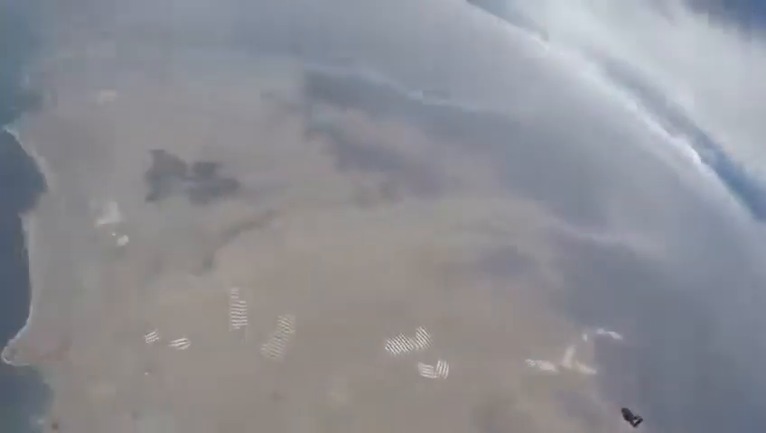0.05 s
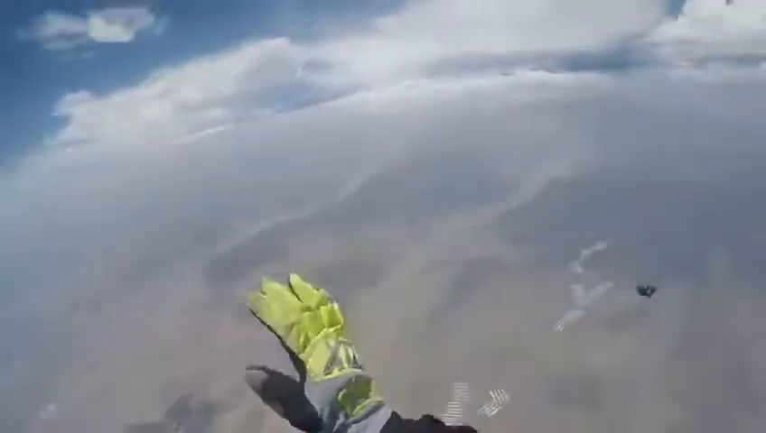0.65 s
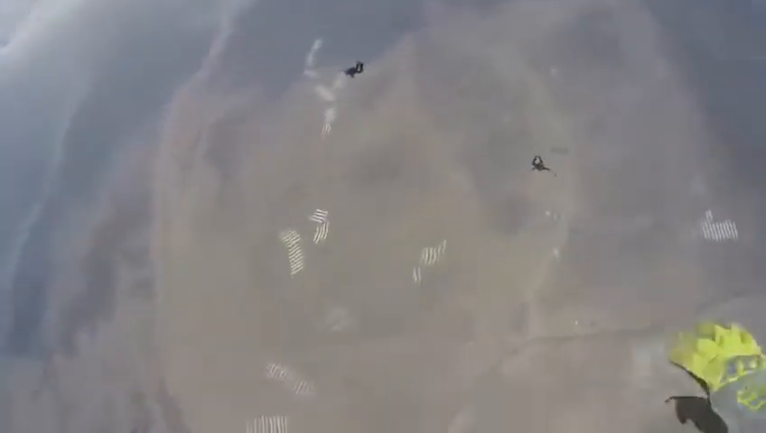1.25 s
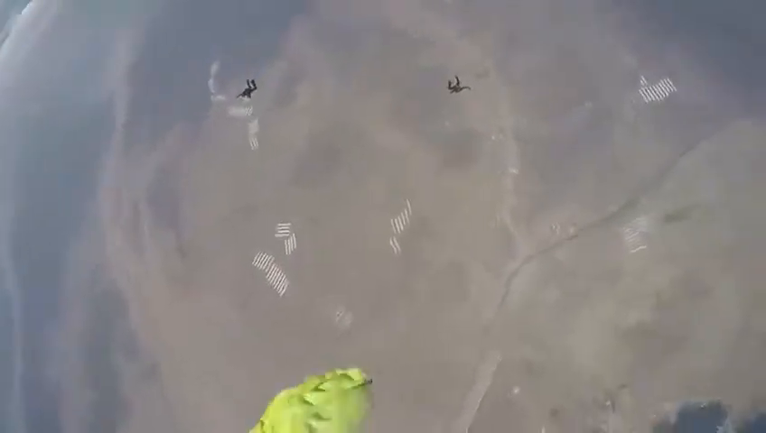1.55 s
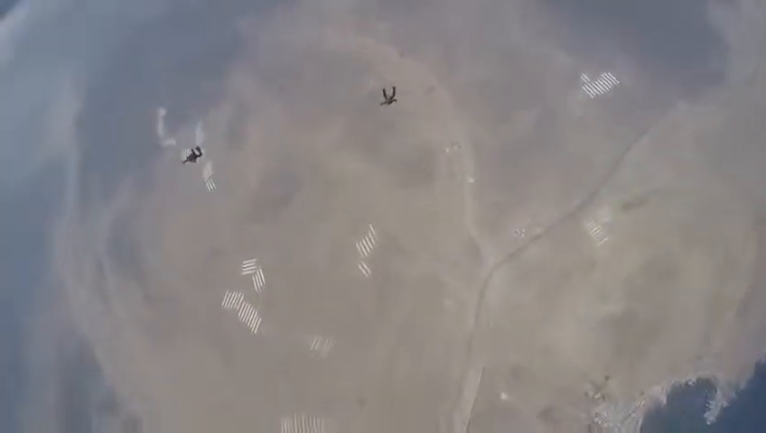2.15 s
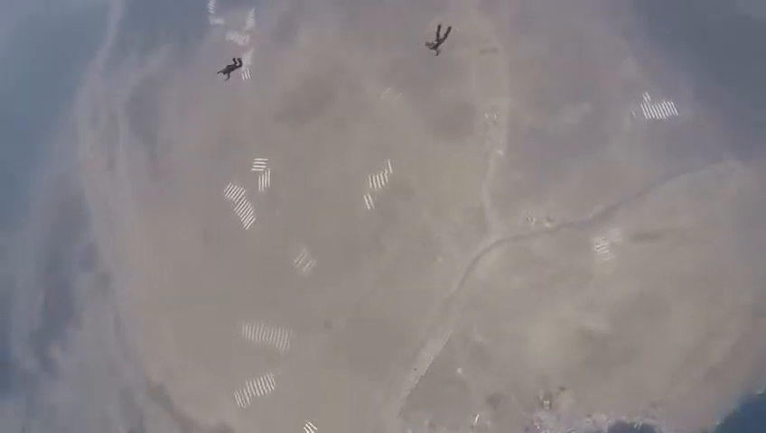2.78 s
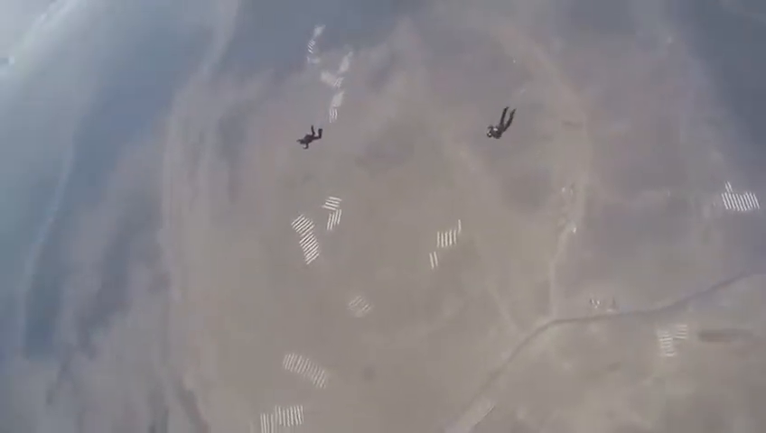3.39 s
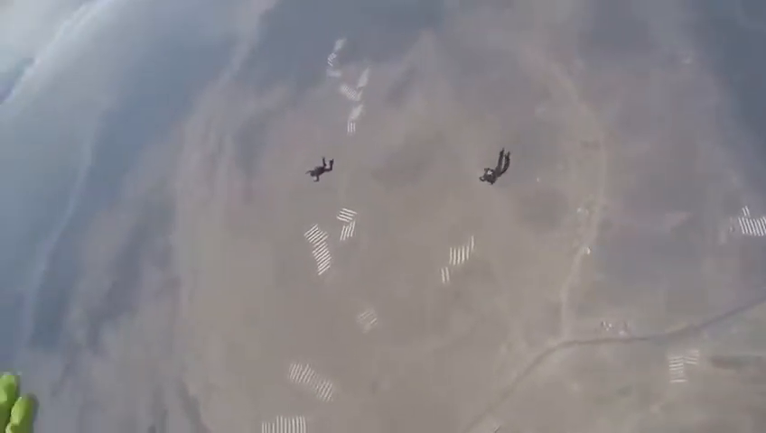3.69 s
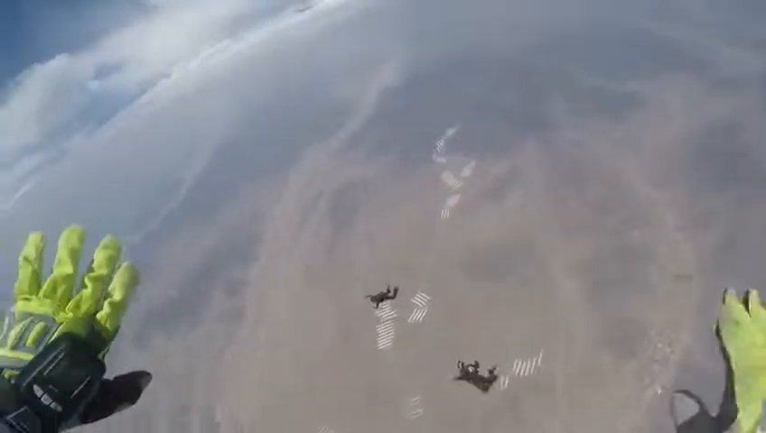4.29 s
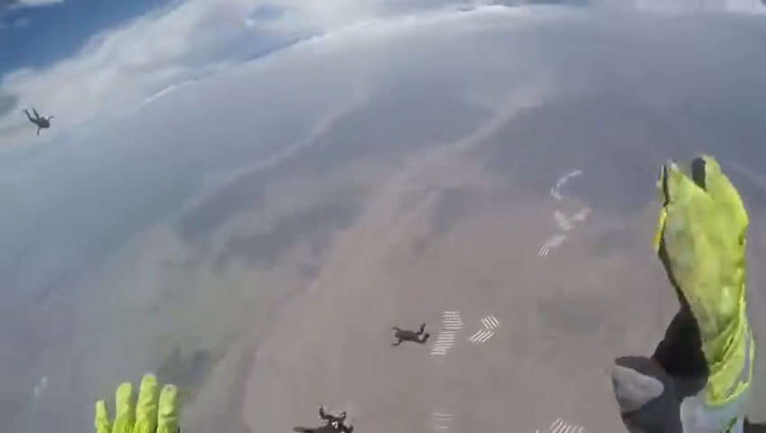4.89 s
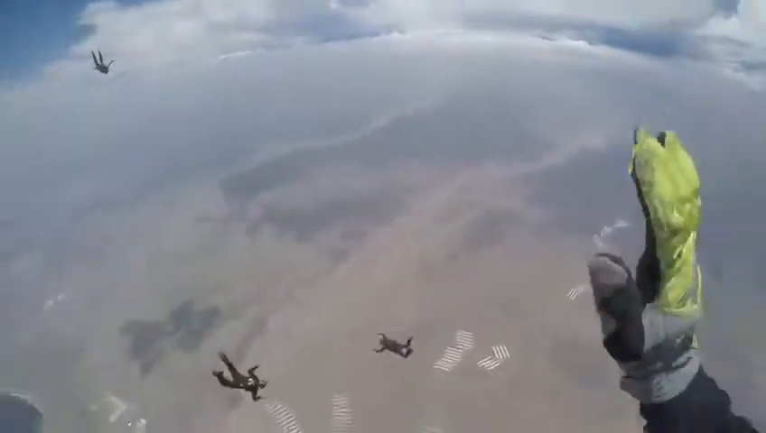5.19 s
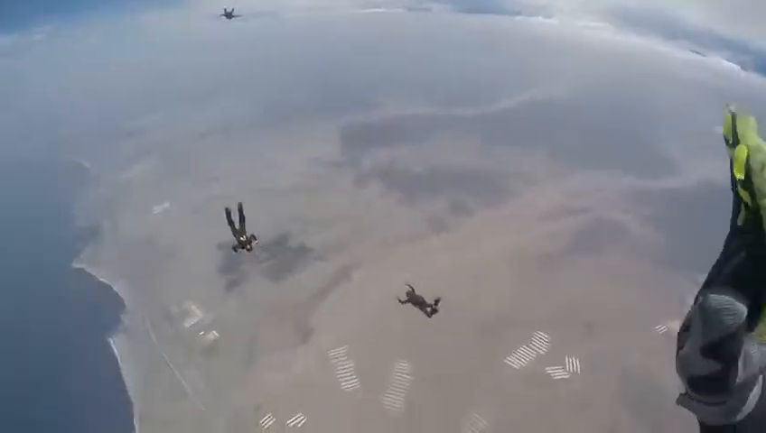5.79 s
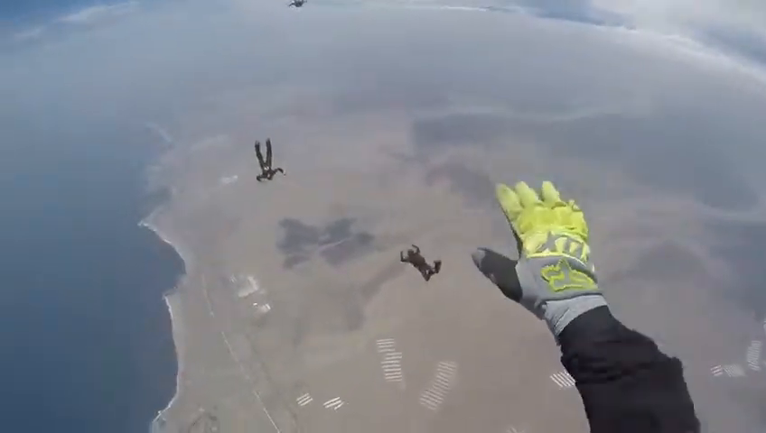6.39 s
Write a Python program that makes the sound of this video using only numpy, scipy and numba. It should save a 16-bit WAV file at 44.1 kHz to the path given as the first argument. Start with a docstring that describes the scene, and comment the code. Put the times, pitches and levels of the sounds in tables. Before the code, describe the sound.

Freefall air batters the microphone without pause, a throbbing low rumble and churning roar topped by a thin, half-whistling hiss.

```python
"""In freefall, at a camera on a skydiver's helmet.
Eddies buffet the housing and break up into churning air; the helmet sheds a throbbing wake.
Air tearing past the edges makes roar, hiss and a bright rush whose pitch sinks when the head looks down.
The housing's cavities colour it all and a limiter holds the peaks."""
import sys
import numpy as np
from scipy import signal
from scipy.fft import rfft, irfft
from scipy.io import wavfile
from scipy.ndimage import uniform_filter1d, minimum_filter1d
from numba import njit

SR = 44100
rng = np.random.default_rng(int(sys.argv[2]) if len(sys.argv) > 2 else 0)


def unload_audio(sound):
    """Save the sound as a 16-bit wav file, at the path given as the first command line argument."""
    columns = np.transpose(np.atleast_2d(sound))
    # keep every value between -1 and 1, then stretch to whole-number steps
    steps = np.round(np.clip(columns, -1, 1) * 32767)
    wavfile.write(sys.argv[1], SR, steps.astype(np.int16))


N = 284445
TIME = np.arange(N) / SR
FREQ = np.maximum(np.arange(N // 2 + 1) * SR / N, 1)


def undb(db):
    """Decibels to gain."""
    return 10 ** (np.asarray(db) / 20)


def curves(table):
    """Each column after time as a value per sample."""
    time_s, *columns = np.transpose(table)
    return [np.interp(TIME, time_s, column) for column in columns]


def bump(at_s, length_s):
    """Smooth rise and fall, length_s wide at half height."""
    return .5 ** ((2 * (TIME - at_s) / length_s) ** 2)


def tilted(down, ahead_hz, down_hz):
    """Slide between the values for looking ahead and looking down."""
    return ahead_hz + (down_hz - ahead_hz) * down


def steady(x, size=4001):
    """Hold the running rms at 1; quick flutter stays."""
    return x / np.sqrt(uniform_filter1d(uniform_filter1d(x * x, size), size))


def colour(x, db):
    """Filter by a gain at every frequency."""
    return irfft(rfft(x) * undb(db), N)


def noise(spectrum):
    """Random pressure of the given spectral shape, rms 1."""
    hz, db = np.transpose(spectrum)
    return steady(colour(rng.standard_normal(N), np.interp(np.log(FREQ), np.log(hz), db)))


def walk(corner_hz):
    """Smooth random drift, standard deviation 1."""
    x = irfft(rfft(rng.standard_normal(N)) / (1 + (FREQ / corner_hz) ** 2), N)
    return (x - x.mean()) / x.std()


@njit
def resonate(x, hz, width_hz):
    """State-variable band-pass with moving centre and width."""
    y, band, low = np.empty(len(x)), 0., 0.
    for i in range(len(x)):
        g, damping = np.tan(np.pi * hz[i] / SR), width_hz[i] / hz[i]
        v = (band + g * (x[i] - low)) / (1 + g * (g + damping))
        band, low = 2 * v - band, low + 2 * g * v
        y[i] = damping * v
    return y


def shedding(hz, width_hz, skirt_hz):
    """Vortices leave an edge at an uneven rate around hz: a steep-sided noise band."""
    core = resonate(rng.standard_normal(N), hz, width_hz * np.ones(N))
    return steady(resonate(core, hz, skirt_hz * np.ones(N)))


def edge_hiss():
    """Air past the edges: flickering hiss and finer sizzle."""
    # (frequency [Hz], relative density [dB])
    hiss_spectrum = [(1200, -30), (2200, 10), (3200, 3), (3850, 11.5), (4100, 0.5), (4600, 0.5), (5450, -7),
                     (6450, -1), (7400, -9), (7750, -21), (8800, -28)]
    sizzle_spectrum = [(1500, -19), (3000, -37), (5000, 4), (7300, 9), (7800, 6.5), (8250, 7), (8750, -2.5),
                       (9400, 1), (10500, 1), (11600, -10.5)]
    # (time [s], hiss level [dB], sizzle level [dB])
    treble_levels = [(0, -26, -35), (.15, -23, -37), (.37, -23.5, -36), (.53, -25, -42.5), (.68, -25, -39),
                     (1.35, -26, -39.5), (1.62, -24.5, -40), (2.75, -25, -44), (3.95, -25.5, -40),
                     (4.25, -26, -40), (5.4, -25.5, -39), (6.28, -24.5, -36.5), (6.45, -24.5, -38)]
    hiss_db, sizzle_db = curves(treble_levels)
    treble = noise(hiss_spectrum) * undb(hiss_db) + noise(sizzle_spectrum) * undb(sizzle_db)
    return treble * undb(0.94 * walk(80))


def edge_roar(turbulence_db, down):
    """Midrange air noise, louder in turbulence and with the head down."""
    # (frequency [Hz], relative density [dB])
    roar_spectrum = [(300, -29), (560, -14), (820, -1.5), (1300, 0), (1900, 1.5), (2800, -3.5), (5000, -35)]
    return noise(roar_spectrum) * undb(-27 + 0.58 * turbulence_db + 2.1 * down)


def edge_rush(gust, turbulence_db, down):
    """Thin edges shed fast vortices and half whistle when they catch the stream."""
    # (time [s], level [dB])
    rush_levels = [(0, -20.5), (.35, -27), (.65, -23), (1.1, -23), (1.6, -19), (2.2, -20.5), (2.8, -19),
                   (3.75, -18.5), (4.2, -21), (5.4, -22.5), (5.7, -21), (6.45, -22)]
    # half whistles: (time [s], length [s], centre [Hz], level [dB])
    swells = [(0.008, 0.17, 3750, -20), (0.213, 0.16, 2730, -20), (.47, 0.099, 2870, -21),
              (1.34, 0.18, 2690, -24.5), (4.042, 0.74, 2510, -25)]
    rush_db, = curves(rush_levels)
    speed = np.exp(0.0099 * gust)
    centre_hz = tilted(down, 2765, 2134) * speed
    width_hz = np.maximum(tilted(down, 980, 1120) + 27 * turbulence_db, 1)  # turbulence smears the band
    rush = shedding(centre_hz, width_hz, skirt_hz=1950) * undb(rush_db)
    for at_s, length_s, hz, db in swells:
        rush += shedding(hz * speed, width_hz=570, skirt_hz=1400) * undb(db) * bump(at_s, length_s)
    # a small edge cannot radiate long waves
    return signal.sosfilt(signal.butter(3, 1500, "high", fs=SR, output="sos"), rush)


def churning(eddies, gust, turbulence_db, down):
    """Small eddies ride on the big ones, so they come in bursts."""
    # (frequency [Hz], relative density [dB])
    churn_spectrum = [(70, -1.5), (170, 10.5), (225, 4.5), (300, 6), (420, -0.5), (620, -2.5), (1000, -9),
                      (2500, -60)]
    burst_db = 1.66 * eddies + 0.84 * gust
    level_db = -26.5 + 1.43 * turbulence_db - 0.6 * down
    return noise(churn_spectrum) * undb(level_db + burst_db)


def wakes(down):
    """The helmet sheds a throbbing wake; the smaller camera sheds faster in the same stream."""
    # (time [s], level [dB])
    helmet_levels = [(0, -19.5), (.4, -25), (.52, -14), (.64, -19.5), (.98, -22), (1.15, -16.5),
                     (1.38, -28.5), (1.58, -15.5), (2.1, -16.5), (2.45, -19.5), (2.7, -27), (3.8, -21.5),
                     (4.0, -17.5), (4.22, -25), (4.5, -16), (4.72, -21), (5.15, -16), (5.3, -22.5),
                     (5.5, -14.5), (5.66, -25), (5.97, -13.5), (6.12, -19.5), (6.45, -15)]
    camera_levels = [(0, -30), (.22, -30.5), (.45, -26.5), (.95, -31), (1.2, -43), (3.8, -35), (4.4, -27),
                     (4.9, -45), (5.9, -46), (6.25, -26.5), (6.45, -26)]
    helmet_db, camera_db = curves(helmet_levels) + curves(camera_levels)
    speed = np.exp(0.052 * walk(2.4))
    helmet = shedding(tilted(down, 103.4, 103) * speed, width_hz=tilted(down, 24.5, 58), skirt_hz=90)
    camera = shedding(188 * speed, width_hz=31, skirt_hz=100)
    return helmet * undb(helmet_db), camera * undb(camera_db)


def buffeting(gust, turbulence_db, down):
    """Big eddies thump the housing amid the wakes and the churning air."""
    # (frequency [Hz], relative density [dB])
    eddy_spectrum = [(6, -22), (12, -4.5), (22, 1), (39, -1.5), (47, 2.5), (57, 5), (72, -5), (95, -10),
                     (200, -65)]
    # (time [s], level [dB])
    eddy_levels = [(0, -23), (.2, -26.5), (.53, -21.5), (.66, -15), (.8, -18), (.95, -15), (1.2, -14),
                   (1.35, -20), (2.5, -19.5), (2.73, -25.5), (2.98, -19), (3.75, -20.5), (4.12, -24),
                   (4.23, -16.5), (5.2, -15.5), (5.75, -18.5), (5.88, -17), (6.45, -15.5)]
    # single big eddies: (time [s], length [s], turbulence rise [dB])
    slaps = [(0.384, 0.045, 3.5), (0.626, 0.027, 2.5), (0.742, .04, 2.5), (1.09, 0.028, 2.5),
             (2.53, .06, 2.5), (4.136, 0.11, 4.5), (4.337, .11, 3), (4.53, 0.25, 5), (5.375, 0.049, 4),
             (6.263, .05, 2.5)]
    eddy_db, = curves(eddy_levels)
    slap_db = sum(db * bump(at_s, length_s) for at_s, length_s, db in slaps)
    eddies = noise(eddy_spectrum)
    thumps = eddies * undb(eddy_db + 0.45 * slap_db)
    helmet_wake, camera_wake = wakes(down)
    churn = churning(eddies, gust, turbulence_db + slap_db, down)
    surge = undb(0.86 * walk(10))
    return (thumps + helmet_wake) * surge + camera_wake + churn


def scene():
    """One turbulent stream, heard through the housing's cavities."""
    # (time [s], strength at the camera [dB])
    turbulence = [(0, 2), (.17, -10.5), (.56, -6.5), (.64, .5), (.97, 3.5), (1.3, -1), (1.5, -.5),
                  (1.7, -4.5), (2.0, 1.5), (2.12, -1.5), (2.3, -0.5), (2.42, -5), (2.7, -6), (3.85, -4),
                  (4.42, -1.54), (5.15, -0.5), (5.5, 0.5), (5.75, -1), (6.45, 0.1)]
    # (time [s], tilt [0 horizon, 1 straight down])
    head_tilt = [(0, 0.11), (1.22, 0), (1.56, 0.85), (2.05, 0.78), (2.7, 1), (3.76, 0.82), (4.02, 0.23),
                 (4.4, 0.051), (6.45, 0.086)]
    # (centre [Hz], width [Hz], gain [dB])
    cavities = [(846, 90, 1), (1326, 330, 2.5), (1580, 150, -0.5), (1853, 325, 3.5), (2247, 67, -6),
                (2378, 140, 2), (2524, 110, -4), (2740, 580, 3.5), (3280, 300, 3), (3770, 66, 4),
                (4720, 70, 5.5), (5990, 260, 7), (8250, 240, 0.5)]
    turbulence_db, down = curves(turbulence) + curves(head_tilt)
    gust = walk(36)
    rumble = buffeting(gust, turbulence_db, down)
    edges = edge_rush(gust, turbulence_db, down) + edge_roar(turbulence_db, down) + edge_hiss()
    tremble = undb(0.58 * gust)
    housing_db = sum(db / (1 + (2 * (FREQ - hz) / width_hz) ** 2) for hz, width_hz, db in cavities)
    return colour(rumble + edges * tremble, housing_db)[None]


def limiter(x, ceiling, size=441):
    """Lower the gain smoothly around each peak above the ceiling."""
    gain = ceiling / np.maximum(np.abs(x), ceiling)
    return x * uniform_filter1d(minimum_filter1d(gain, size), size)


def record(dry):
    """The camera limits the peaks and cuts the top."""
    top_hz = 11600
    held = limiter(dry, ceiling=.88)
    return signal.sosfilt(signal.ellip(10, .2, 80, top_hz, fs=SR, output="sos"), held)


dry = scene()
out = record(dry)
unload_audio(out)
```